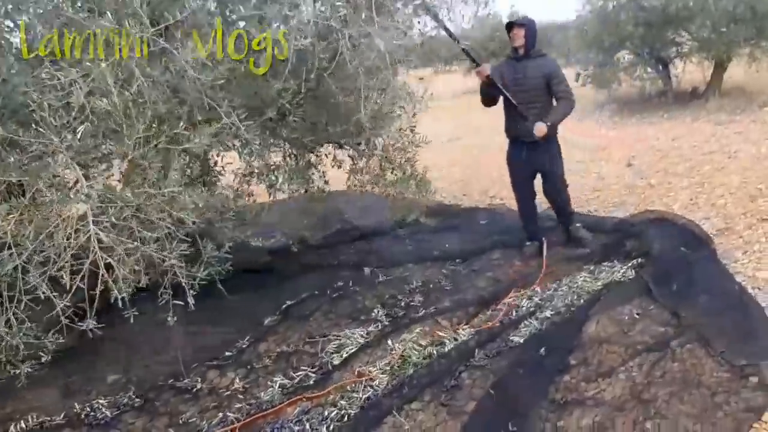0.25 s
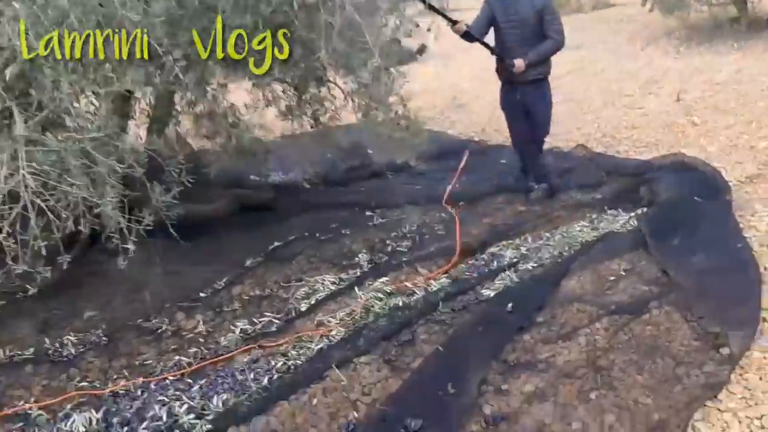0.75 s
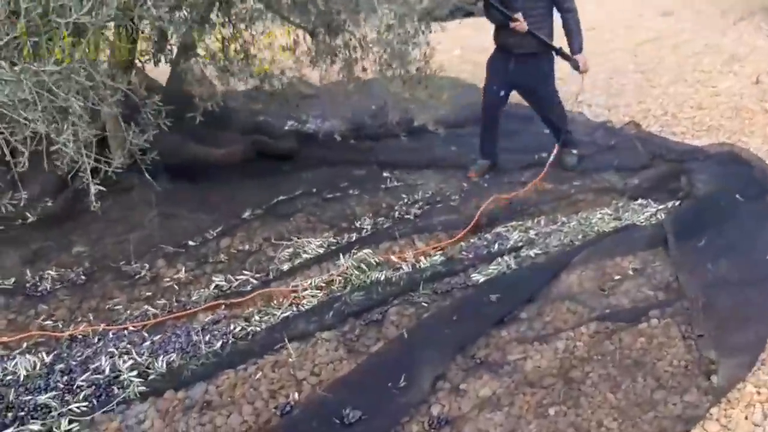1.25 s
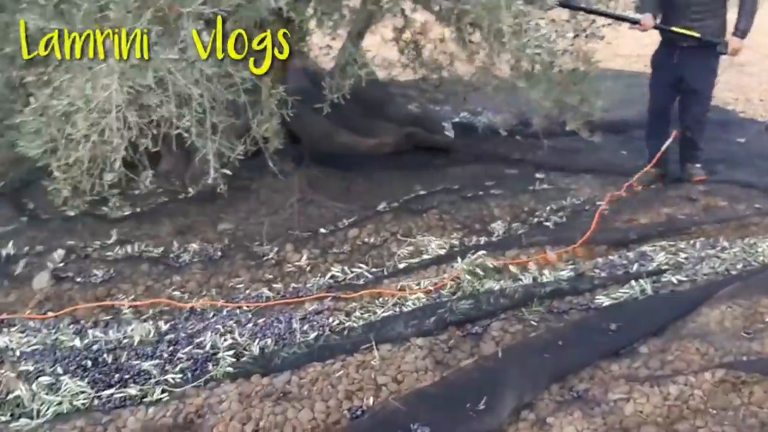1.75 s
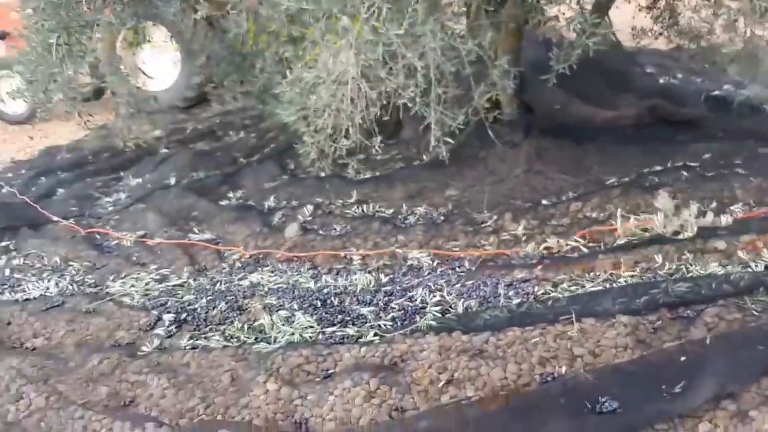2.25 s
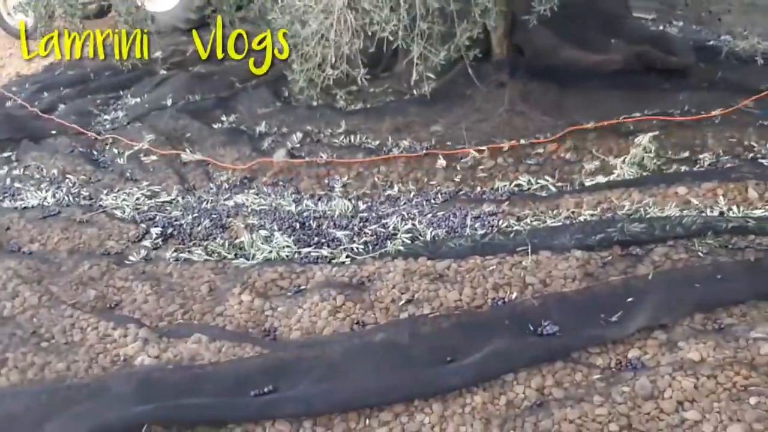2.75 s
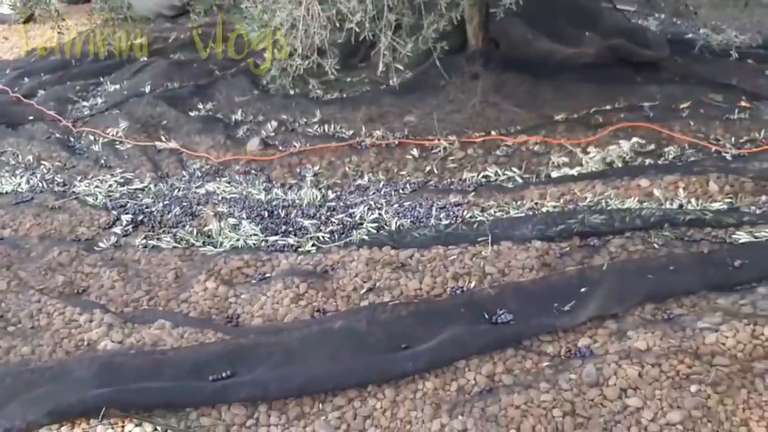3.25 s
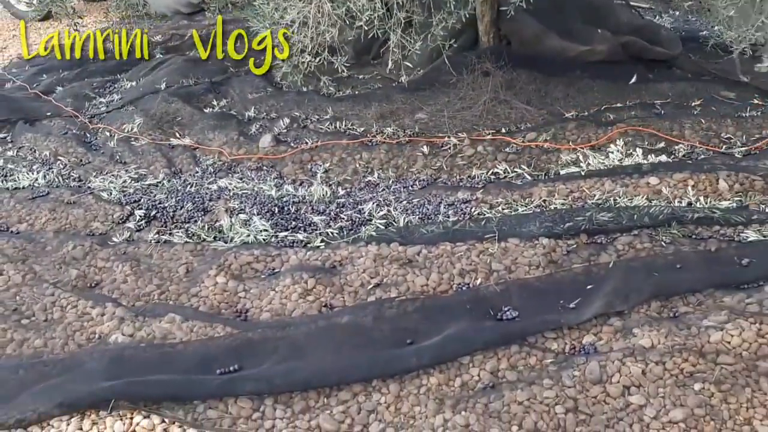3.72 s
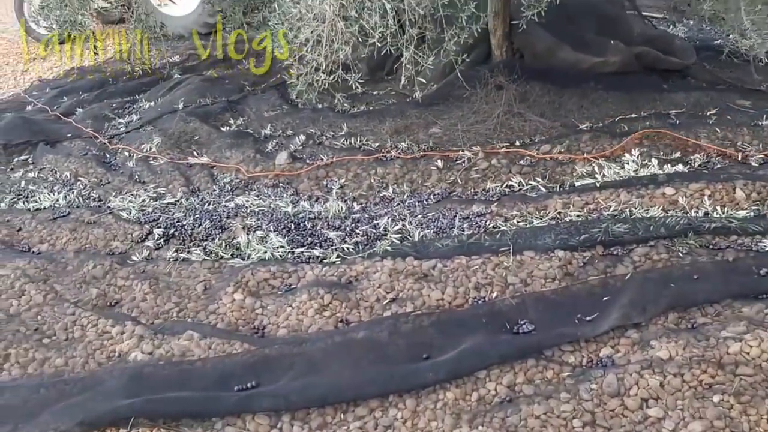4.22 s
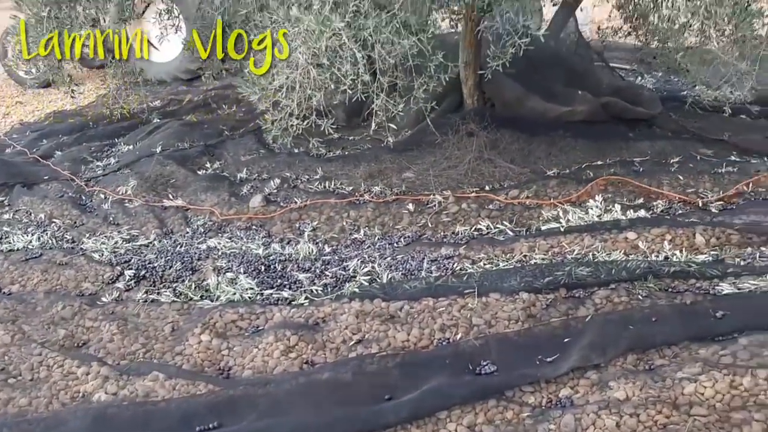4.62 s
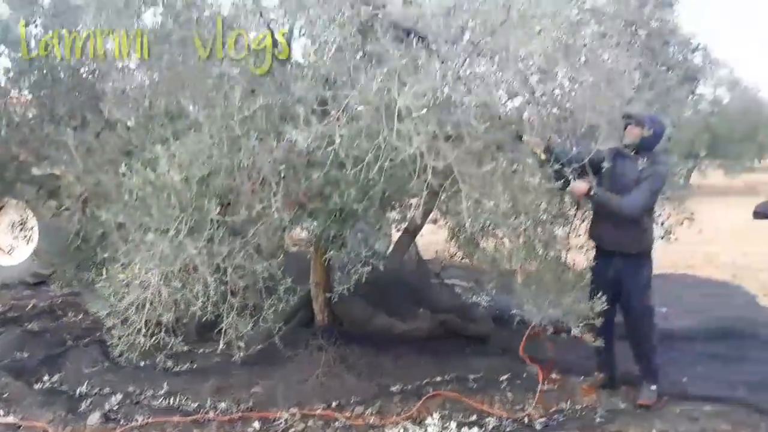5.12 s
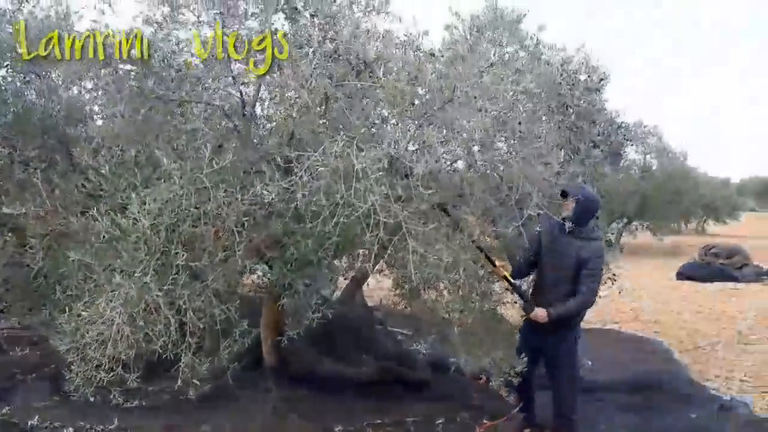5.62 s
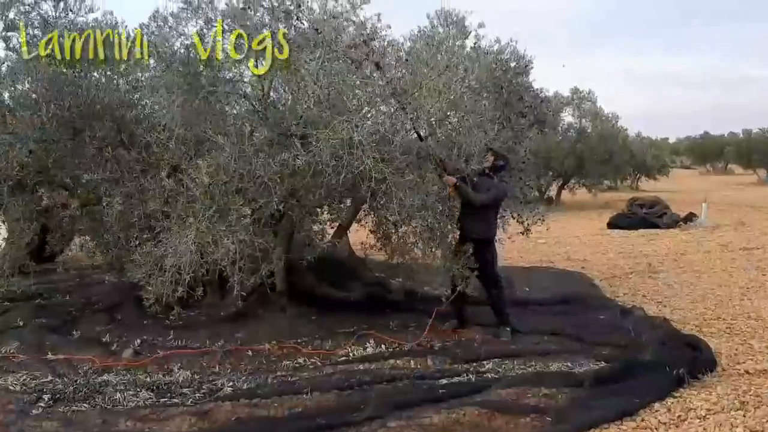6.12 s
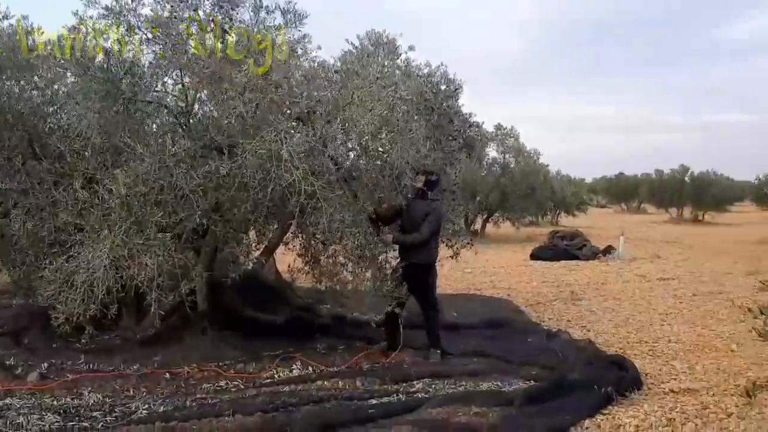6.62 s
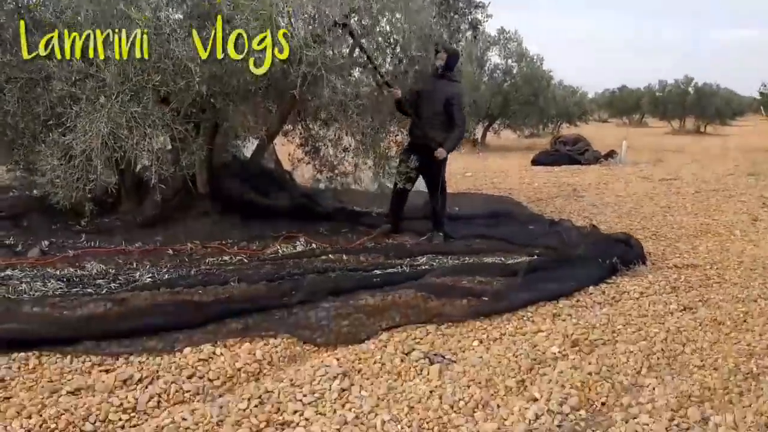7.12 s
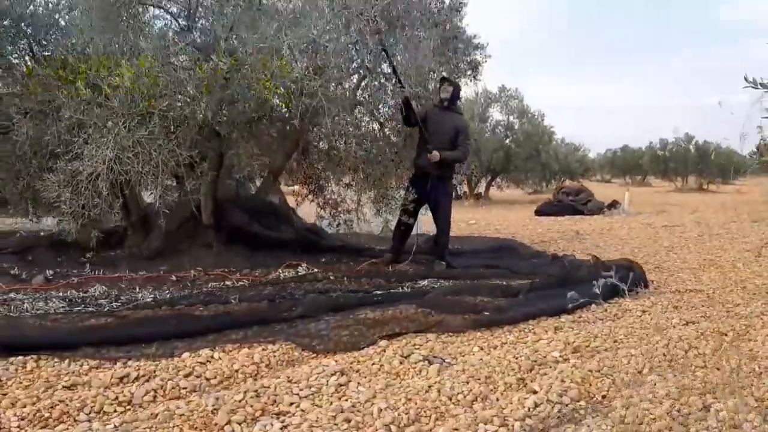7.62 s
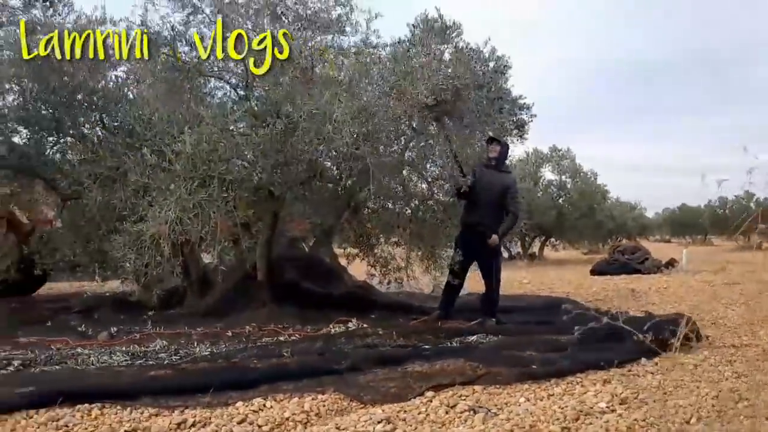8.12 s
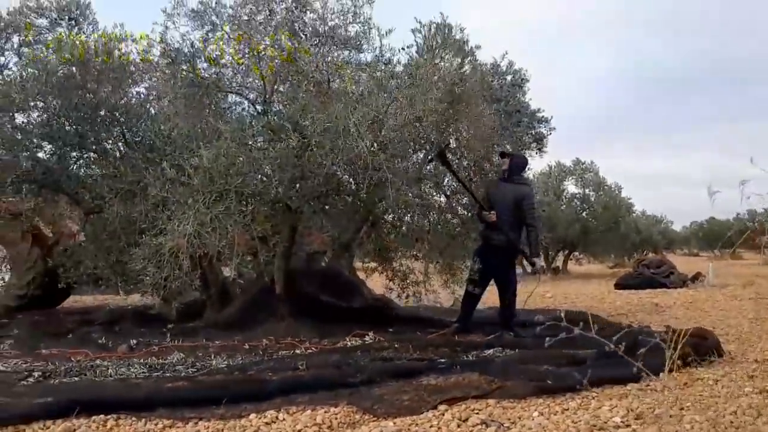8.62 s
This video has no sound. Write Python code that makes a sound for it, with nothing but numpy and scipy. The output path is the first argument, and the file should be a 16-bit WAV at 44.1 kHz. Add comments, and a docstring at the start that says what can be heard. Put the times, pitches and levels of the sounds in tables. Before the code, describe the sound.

A few metres away in an open orchard, an electric rake combs an olive tree, its tines clacking rapidly over a high gear whine. Each push slows the motor and stirs twigs and leaves, with sharp cracks against branches. Past the middle, wind buffets the hand-held microphone. The sound drops out for an instant, then the rake carries on, quieter and farther off.

```python
"""An electric rake combs olives out of a tree, a few metres from a hand-held microphone in an open orchard.
From the start its tines clack at every turn of their stroke over the whine of the gears. Each push into
the foliage slows the motor, muffles the whine and stirs twigs, leaves and boughs; tines crack against
branches, hardest around 2 s. From 5 s wind buffets the microphone. Just before 6 s the sound fades
briefly, then the rake returns farther off and works on to the end."""
import sys
import numpy as np
from scipy import signal
from scipy.fft import rfft, irfft, next_fast_len
from scipy.io import wavfile
from scipy.ndimage import uniform_filter1d

SR = 44100
rng = np.random.default_rng(int(sys.argv[2]) if len(sys.argv) > 2 else 0)


def wav_out(sig):
    """Save sig, one row per channel (or a flat mono array), as 16-bit PCM at SR to the path in sys.argv[1]."""
    wavfile.write(sys.argv[1], SR, np.round(np.clip(np.atleast_2d(sig).T, -1, 1) * 32767).astype(np.int16))


N = 390726
TIME = np.arange(N) / SR

FREE_HZ, TEETH_PER_STROKE, INERTIA_S = 4602, 134.4, .05  # the drive; FREE_HZ is its unloaded whine
CLACK_AT = .5  # where the clack falls in the stroke cycle
STIR_S, SETTLE_S = 0.031, 0.029  # attack and release of the foliage on each push

# Motor speed as the pitch of the whine, sagging under load: (time [s], pitch [Hz])
MOTOR_PITCH = [(.35, 4600), (.5, 4420), (.85, 4310), (1.15, 4300), (1.35, 4570), (1.55, 4590), (1.7, 4250),
               (1.9, 3950), (2.05, 3780), (2.15, 3950), (2.25, 4290), (2.48, 4110), (2.65, 4540),
               (2.9, 4460), (3.15, 4430), (3.3, 4540), (3.5, 4420), (3.72, 4100), (4.0, 4530), (4.5, 4600),
               (4.83, 4600), (4.98, 4330), (5.35, 4150), (5.65, 4560), (6.05, 4580), (6.5, 4200),
               (6.9, 4350), (7.25, 4590), (7.6, 4560), (7.9, 4020), (8.45, 4560), (8.86, 4600)]
# Fader for the gear whine, before load muffles it: (time [s], level [dB])
WHINE_LEVEL = [(0, -62), (1.4, -58.5), (2.75, -58.5), (3.3, -57.5), (4.1, -57.5), (4.45, -50), (4.8, -50.5),
               (4.95, -55), (5.5, -51), (5.68, -45.5), (5.88, -45), (5.98, -62), (6.9, -67), (7.3, -66.5),
               (7.55, -70), (8.2, -66), (8.86, -68)]
# Motor hum, riding on the head's fader: (time [s], fundamental [dB], octave [dB])
HUM_LEVELS = [(0, -14, -12), (.8, -10.5, -14), (2.3, -13, -12), (2.9, -9, -7), (3.4, -6.5, -10),
              (3.7, -17, -16), (4.3, -9.5, -9), (5.2, -40, -9), (5.8, -28, -21), (7.0, -25, -15),
              (7.55, -11.5, -12), (8.86, -12.5, -10.5)]
# Faders for the bed between pushes: (time [s], head clatter [dB], twig rattle [dB], leaf hiss [dB])
BED_LEVELS = [(0, -50, -50, -59), (.3, -49.5, -47.5, -55), (.7, -49.5, -50, -50), (1.1, -45, -50.5, -50.5),
              (1.45, -46, -43.5, -56), (2.0, -46.5, -52.5, -58.5), (2.6, -55, -47, -56.5),
              (3.1, -55, -48, -53.5), (3.6, -46.5, -46, -57.5), (4.3, -47, -44, -57.5),
              (4.75, -44, -44.5, -54.5), (5.3, -48, -48, -62), (5.88, -46, -39.5, -55),
              (5.95, -60.5, -56, -72.5), (6.5, -52.5, -55.5, -63.5), (6.72, -53.5, -57, -53),
              (7.0, -56, -58.5, -64), (7.5, -54, -58, -67), (7.9, -54, -51.5, -56.5),
              (8.4, -55.5, -54, -57), (8.86, -56.5, -55.5, -59.5)]
# Ring of the tines, loudest while they swing free: (time [s], low ring [dB], high ring [dB])
TINE_LEVELS = [(0, -55.5, -64), (.3, -53, -50), (.6, -56, -60), (1.05, -67, -56), (1.25, -59, -58),
               (1.52, -46, -55), (1.75, -51, -59), (2.5, -57.5, -62), (3.45, -67, -50), (3.7, -77, -53),
               (4.05, -46.5, -50.5), (4.45, -50.5, -52), (5.2, -63, -62), (5.85, -49.5, -55),
               (6.0, -61, -65), (7.55, -65, -68), (8.5, -71, -67), (8.86, -59, -52.5)]
# Pushes into the foliage: (start [s], length [s], sprigs against the twig bed [dB],
# twig boost [dB], leaf boost [dB], bough boost [dB])
PUSHES = [(0.37, 0.19, -30, 4.5, 0, 17), (0.608, 0.38, 0, 3.5, 1.5, -9), (0.926, 0.25, 2, 8, 1, 14),
          (1.549, 0.34, -7, 6.5, 11, 15.5), (1.892, 0.36, -1, 10, 12.5, 15.5), (2.244, 0.29, -13, 0, 6, 17),
          (3.302, 0.25, -1, 1.5, 6.5, 7), (3.525, 0.35, 3.5, -3, 11.5, 13.5), (3.89, 0.21, -37, 1, 5.5, 8),
          (4.863, 0.36, -30, 1, 10, 5), (5.196, 0.3, -32, 3, 11.5, 5), (5.51, 0.33, -34, -4, -3.5, 11),
          (6.189, 0.37, -14, 2, 7, 2), (6.815, 0.22, -25, 6, -0.5, 4), (7.668, 0.39, -2, 3, 2, 15.5),
          (8.095, 0.32, -12, -0.5, -2, 11)]
# Tines hitting branches: (time [s], level [dB], brightness [dB], length [factor], ring pitch [Hz])
BRANCH_HITS = [(0.101, -35, -30, 0.49, 3080), (0.2177, -27, -17, 0.48, 5700), (0.375, -29.5, -14, 2, 4560),
               (0.386, -25.5, -14, 4.2, 5430), (0.419, -26.5, -25, 1.3, 2700), (0.5276, -29, -21, .7, 4380),
               (0.6594, -32, -19, 0.49, 4000), (0.8188, -24, -11, 1.2, 5700), (0.958, -25.5, -27, 1, 6150),
               (0.974, -24.5, -23, 0.32, 4860), (1.024, -18, -33, 0.35, 5040), (1.076, -27, -10, 2.4, 4500),
               (1.095, -22, -34, .8, 6300), (1.13, -23.5, -7, 0.81, 5860), (1.1944, -18.5, -3, 0.34, 6500),
               (1.6098, -24.5, -33, 1.7, 5840), (1.724, -21.5, -37, 1.3, 4200),
               (1.894, -26, -10, 1.5, 4200), (1.9228, -29, -7, 0.41, 5530), (1.952, -22.5, -12, 1.9, 5660),
               (1.9636, -21.5, -14, 1.5, 5900), (1.9902, -17.5, -29, 0.77, 6200),
               (2.0334, -12, -1.5, 0.96, 5770), (2.0713, -17.5, -35, 0.87, 5800),
               (2.0973, -16, -1.5, 1.7, 6050), (2.1317, -16.5, 5, 0.98, 5850),
               (2.135, -19.5, -23, .7, 6100), (2.165, -28, -22, 1.1, 3720),
               (2.3721, -24.5, -18, 0.68, 3700), (3.7326, -25, -12, 1.4, 6200),
               (3.7445, -27, -24, 0.8, 6000), (3.8383, -28, -4, 1.2, 6070), (4.609, -26, -14, 0.5, 5030),
               (5.3024, -22, -17, 2.3, 2770), (5.368, -19, -15, 1, 3630), (5.689, -36, -30, 0.69, 3700),
               (6.3032, -38, -14, 1.3, 2830), (6.3669, -36, -8, .5, 3960), (6.487, -33.5, -11.5, 1.7, 5800),
               (6.5258, -29.5, -8, 1.4, 5700), (6.7441, -35, -9, .8, 6490), (6.8122, -30.5, -2, 1.2, 6230),
               (6.853, -30.5, -22, 0.58, 4000), (6.91, -31, -30, 0.58, 4200),
               (6.9142, -34, -36, 0.57, 3700), (7.802, -31, -32, 1, 3670), (7.8567, -24.5, -12, 0.65, 6030),
               (7.984, -30, -10, .7, 3700), (8.049, -33, -22, 3.1, 3650), (8.0582, -31, -19, 2.1, 3600),
               (8.2632, -32, -31, 0.26, 3770)]
# The head shoving a bough: (time [s], level [dB])
BOUGH_HITS = [(0.385, -50), (0.5, -47), (0.939, -45.5), (1.07, -47), (1.109, -52), (1.6, -47.5), (1.7, -56),
              (1.796, -60), (1.955, -45.5), (2.16, -46), (5.3, -56), (7.875, -52.5), (8.688, -56)]

# Tone of each noise layer: (frequency [Hz], level [dB])
HEAD_EQ = [(150, -41.5), (330, -12), (490, -11), (600, -6.5), (680, -7.5), (950, -0.5), (1170, -2),
           (1550, 0), (1850, -2.5), (2250, 1), (2800, -1.5), (4000, -8), (8000, -59.5)]  # midrange clatter of the rake's head
TINE_LOW_EQ = [(300, -27.5), (1200, -10.5), (1900, -11), (2500, 1), (3450, -3), (4200, -19.5), (7000, -8),
               (9000, -51)]  # low ring of the tines
TINE_HIGH_EQ = [(300, -28), (1200, -12.5), (3000, -13), (3750, 2), (4550, -3), (5100, -6.5), (6500, -1),
                (7800, -28.5), (15000, -21)]  # high ring of the tines
TWIG_EQ = [(120, -17.5), (350, -14.5), (800, -4.5), (2000, -9.5), (3100, -1), (3650, 1.5), (4200, -1),
           (5000, -2.5), (5950, -3), (6600, -4.5), (7400, -23), (8300, -18.5), (11000, -19), (16000, -19)]  # dry rattle
LEAF_EQ = [(100, -22.5), (400, -7), (1500, -9.5), (6000, 4.5), (7300, -3.5), (8300, -13.5), (9400, -8.5),
           (10300, -5), (12500, -3), (14500, -4), (16000, -8)]  # airy hiss
THRASH_EQ = [(60, -17), (150, -11), (260, -6), (380, -2), (520, -3), (800, -5.5), (2000, -26)]  # low body of shaken boughs
SPRIG_EQ = [(1000, -60), (4200, -17), (5300, -4), (5900, 5), (6500, 4), (7400, -20.5), (12000, -36)]  # thin, bright patter
CRACK_EQ = [(150, -36), (450, -12), (1100, -7.5), (1900, -9), (2700, -1.5), (3700, 2.5), (4700, -1.5),
            (5900, 3.5), (6700, -3), (8200, -23.5), (10400, -17), (16000, -19.5)]  # struck branch
CLUNK_EQ = [(100, -33), (220, -5.5), (350, -4), (650, -4), (1000, -9), (2000, -12.5), (5000, -45)]  # shoved bough
WIND_EQ = [(20, -25), (40, -21), (70, -3), (100, -2), (150, -3.5), (210, -8.5), (320, -16.5), (600, -26),
           (2000, -85)]  # rumble on the microphone

# Hollow ring of the rake, shifting as the pole swings:
# (time [s], centre [Hz], boost [dB], boost of the upper ring [dB])
POLE_RESONANCE = [(0, 1270, 7, -1), (.8, 1150, 0.5, -0.5), (1.4, 1270, 5.5, -1.5), (2.3, 1110, 3.5, 1.5),
                  (3.3, 1110, 7, -0.5), (4.7, 1140, 2.5, -2.5), (5.25, 1030, 0, 0.5),
                  (6.5, 1100, 5.5, -1.5), (6.9, 1150, 4, 1), (7.15, 1340, 6.5, -0.5), (7.4, 1460, 1, -3.5),
                  (7.8, 1164, 0, -1.5), (8.3, 1160, 1.5, -3.5), (8.75, 1140, 10, -2)]
# Where the microphone points: (time [s], downward tilt [0-1], left channel delay [samples])
MIC_AIM = [(0, 0.4, 1.5), (1.3, 0.43, -0.5), (2.0, 1, 9), (2.6, 1, 11), (4.7, 1, 8.5), (5.15, 0.4, -3),
           (6.7, 0, -2.5), (8.86, 0.44, 1)]
# Colour of the ground reflection at full tilt: (frequency [Hz], gain [dB])
GROUND_EQ = [(230, -11), (420, 0.5), (590, 0), (820, -0.5), (1200, 0), (1400, -0.5), (1620, 3.5),
             (1880, -1), (2300, 2.5), (2550, -1), (2800, 0), (3050, -2.5), (3500, -0.5), (4400, 1),
             (5300, 0.5)]
# Left channel against the right: (frequency [Hz], gain [dB])
LEFT_EQ = [(300, -0.5), (700, -2), (1400, 0.7), (2800, -1.1), (5500, -2), (9000, 1.5), (14000, 0.5)]
# Shading of the left channel at full tilt: (frequency [Hz], gain [dB])
SHADE_EQ = [(500, 1), (1500, 0.5), (3500, -0.5), (6000, -1), (10000, -1.5)]
# Stereo image, tight in the mids and wide on top: (frequency [Hz], channel likeness [0-1])
STEREO_LIKENESS = [(100, 0.88), (300, 0.95), (600, 0.99), (1300, 0.74), (2800, 0.51), (5500, 0.46),
                   (12000, 0)]

# Breeze on the microphone between gusts: (time [s], level [dB])
BREEZE_LEVEL = [(0, -66), (.3, -66), (.9, -67), (1.35, -83), (1.7, -70), (2.0, -80), (3.1, -83.5),
                (3.7, -76), (4.2, -82), (4.7, -74.5), (5.1, -60), (5.4, -57), (5.87, -45), (5.95, -64),
                (6.4, -95), (6.9, -84), (7.6, -73), (8.3, -68), (8.86, -69)]
# Swells of wind: (time [s], half width [s], level [dB])
WIND_GUSTS = [(.02, 0.036, -50.5), (.59, 0.035, -58), (1.01, 0.025, -62), (1.62, 0.036, -66),
              (2.22, 0.025, -64), (2.49, 0.038, -69), (2.81, 0.03, -66), (5.01, 0.015, -54),
              (5.195, 0.025, -43), (5.24, .012, -48), (5.282, .007, -46), (5.318, .012, -48),
              (5.38, 0.0092, -51), (5.48, 0.012, -38.5), (5.575, 0.027, -42.5), (5.695, 0.011, -40.5),
              (5.75, 0.011, -46), (5.81, .018, -39.5), (6.08, 0.021, -62.5), (6.98, 0.028, -58.5),
              (7.35, 0.011, -56.5), (7.62, 0.055, -60.5), (8.52, 0.013, -61), (8.62, 0.043, -56.5),
              (8.84, .02, -62)]
# Single low bumps of wind: (time [s], level [dB], pitch [Hz])
WIND_BUFFETS = [(0.606, -41.5, 155), (5.205, -31, 230), (5.475, -29, 144), (5.488, -30, 131),
                (5.793, -26, 165), (5.855, -32, 178)]
# Master fader, dipping briefly to near silence: (time [s], gain [dB])
MASTER_FADE = [(5.87, 2), (5.9, -25), (5.915, -80), (5.93, -37), (5.95, -12.5), (5.985, 2)]


def amp(db):
    """Decibels to gain."""
    return 10 ** (np.asarray(db) / 20)


def unit(x):
    """Scales to rms 1."""
    return x / np.sqrt(np.mean(x ** 2) + 1e-20)


def curve(rows, column=1, t=TIME):
    """One column of a table as an automation lane of straight ramps."""
    rows = np.array(rows)
    return np.interp(t, rows[:, 0], rows[:, column])


def spectrum_at(points, hz):
    """Reads a spectrum, joined by straight lines on a log frequency axis."""
    f, value = np.transpose(points)
    return np.interp(np.log(hz + 1), np.log(f + 1), value)


def add(mix, s, sound):
    """Mixes a stereo sound in at time s."""
    part = mix[:, max(round(s * SR), 0):][:, :sound.shape[1]]
    part += sound[:, :part.shape[1]]


def wander(hz):
    """Random modulation of rms 1, moving at rates up to hz."""
    coarse = rng.standard_normal(16384)
    rates = np.fft.rfftfreq(len(coarse), TIME[-1] / len(coarse))
    slow = irfft(rfft(coarse) * (rates < hz))
    return unit(np.interp(TIME, np.linspace(0, TIME[-1], len(slow)), slow))


def colour(x, eq):
    """Plays x through a causal EQ of unit energy."""
    log_gain = np.log(amp(spectrum_at(eq, abs(np.fft.fftfreq(4096, 1 / SR)))))
    taps = np.fft.ifft(np.exp(np.conj(signal.hilbert(log_gain)))).real[:2048]
    return signal.oaconvolve(x, taps[None] / np.linalg.norm(taps), axes=1)[:, :x.shape[1]]


def causal(db):
    """Turns gains in dB (bins x frames) into filters that ring only after a hit."""
    cepstrum = irfft(db * np.log(10) / 20, axis=0)
    half = len(cepstrum) // 2
    cepstrum[1:half] *= 2
    cepstrum[half + 1:] = 0
    return np.exp(rfft(cepstrum, axis=0))


def noise_pair(likeness=1.0):
    """Stereo white noise, near mono in the mids and wide in the treble."""
    size = next_fast_len(N, real=True)
    left, other = rfft(rng.standard_normal((2, size), dtype=np.float32))
    same = likeness * spectrum_at(STEREO_LIKENESS, np.fft.rfftfreq(size, 1 / SR))
    same = np.clip(same, 0, .99).astype(np.float32)
    right = same * left + np.sqrt(1 - same ** 2) * other
    return irfft(np.array([left, right]), size)[:, :N]


def texture(power, eq):
    """Stereo noise shaped by a power envelope, then an EQ; rms 1."""
    return unit(colour(noise_pair() * np.sqrt(power), eq))


def die_away(power, decay_s):
    """Gives each impulse of power an exponential tail; mean 1."""
    pole = np.exp(-1 / (decay_s * SR))
    tail = signal.lfilter([1 - pole], [1, -pole], power + 1e-12)
    return tail / tail.mean()


def collisions(per_s, spread_db):
    """Random impulses, a few of them large."""
    chance = rng.random(N) * SR / per_s
    hit, size = chance < 1, np.zeros(N)
    size[hit] = amp(spread_db * np.minimum(-np.log(chance[hit] + 1e-12), 4))
    return size


def grains(per_s, spread_db, decay_s):
    """Grainy power envelope of many small collisions."""
    return die_away(collisions(per_s, spread_db) ** 2, decay_s)


def strokes(turns, at, spread_db):
    """One impulse of power a stroke, at the given share of the cycle, each of its own strength."""
    hits = np.flatnonzero(np.diff(np.floor(turns - at)) > 0)
    accent = np.clip(rng.standard_normal(1000), -2, 2)
    power = np.zeros(N)
    power[hits] = amp(spread_db * accent[:len(hits)]) ** 2
    return power


def tine_clacks(turns, sag_hz):
    """Power envelope of the clacks: two rows of tines reverse a moment apart."""
    accent_db = 2.5 * np.exp(-sag_hz / 550)  # one turn hits harder than the return; load evens them out
    accent = amp(accent_db * np.cos(np.pi * (turns - CLACK_AT))) ** 2
    first, second = (strokes(turns, CLACK_AT - lead, spread_db=1.2) for lead in (.05, 0))
    return die_away(uniform_filter1d(accent * (0.72 * first + second), 30), decay_s=0.003)


def linkage_ticks(turns):
    """Power envelope of the play in the linkage, closing twice between clacks."""
    first, second = (strokes(turns, CLACK_AT + lag, spread_db=1.8) for lag in (1 / 3, 2 / 3))
    return die_away(uniform_filter1d(first + .6 * second, 60), decay_s=0.0024)


def rake(turns, sag_hz):
    """Each stroke clatters the head, rings the tines and shakes a spray of collisions out of the tree."""
    clack, tick = tine_clacks(turns, sag_hz), linkage_ticks(turns)
    shake = .7 + 0.22 * clack
    twigs = grains(700 * shake, spread_db=4.6, decay_s=0.0028)
    leaves = grains(1000 * shake, spread_db=5.5, decay_s=0.00074)
    jolts = grains(400 * shake, spread_db=5.0, decay_s=0.0032)
    clatter = texture(0.3 + 0.29 * clack + 0.19 * tick + 0.22 * jolts, HEAD_EQ)
    head = amp(curve(BED_LEVELS) - 1.24) * clatter
    tree = foliage(clack, tick, shake, twigs, leaves, jolts) + sprigs()
    return head + tree + tine_ring(clack, tick)


def tine_ring(clack, tick):
    """The tines ring briefly at every clack, and more softly as the play in the linkage closes."""
    blows = clack + amp(-10) * tick
    low, high = texture(blows, TINE_LOW_EQ), texture(blows, TINE_HIGH_EQ)
    return amp(curve(TINE_LEVELS)) * low + amp(curve(TINE_LEVELS, column=2)) * high


def gears(turns, sag_hz):
    """The gear mesh whines over the motor's hum; both wobble with the stroke and flutter in the leaves."""
    pitch_hz = (FREE_HZ - sag_hz) * (1 + 0.0026 * wander(hz=25))
    mesh_cycles = np.cumsum(pitch_hz) / SR + 0.12 * np.sin(2 * np.pi * turns)
    judder = .78 + sag_hz / 900  # load roughens the mesh
    whine = np.zeros((2, N))
    for channel in whine:
        tone = np.sin(2 * np.pi * mesh_cycles + judder * wander(hz=80))
        channel += tone * amp(2.4 * wander(hz=90))
    whine *= amp(2.2 * wander(hz=18) + 2 * np.cos(2 * np.pi * turns))
    muffle_db = .011 * sag_hz  # foliage closes around the head
    return amp(curve(WHINE_LEVEL) + 3.0 - muffle_db) * unit(whine) + motor_hum(mesh_cycles / 7.5)


def motor_hum(shaft_turns):
    """The spinning shaft hums: a fluttering fundamental and its octave."""
    hum = np.zeros(N)
    for harmonic in (1, 2):
        tone = np.sin(2 * np.pi * harmonic * shaft_turns + 1.05 * wander(hz=35))
        flutter_db = 2.6 * wander(hz=20)
        hum += amp(curve(HUM_LEVELS, column=harmonic) + flutter_db - 1.5) * tone
    return amp(curve(BED_LEVELS)) * hum


def foliage(clack, tick, shake, twigs, leaves, jolts):
    """Twigs rattle, leaves hiss and boughs thrash under the strokes, swelling with the pushes."""
    scrape = noise_pair() * np.sqrt(0.4 + 0.17 * clack + 0.1 * tick + 0.33 * twigs)
    taps = twig_taps(900 * shake, spread_db=3.0, ring_cycles=6.2)
    rattle = unit(colour(scrape + 0.5 * taps, TWIG_EQ))
    hiss = texture(0.65 + 0.015 * clack + 0.031 * tick + 0.42 * twigs + 0.2 * leaves, LEAF_EQ)
    thrash = texture(0.22 + 1.1 * jolts, THRASH_EQ)
    sway_db = 1.93 * wander(hz=16)  # sprigs catch and slip, so the rustle swells unevenly
    twigs_db = curve(BED_LEVELS, column=2) + push_boost(column=3) + .5 * sway_db
    leaves_db = curve(BED_LEVELS, column=3) + push_boost(column=4) + sway_db + 3.5
    boughs_db = curve(BED_LEVELS) - 23 + push_boost(column=5)
    return amp(twigs_db) * rattle + amp(leaves_db) * hiss + amp(boughs_db) * thrash


def push_boost(column):
    """One column of PUSHES as a fader move in dB: each push takes hold, stays and lets go."""
    boost_db = np.zeros(N)
    for push in PUSHES:
        start = max(round(push[0] * SR), 0)
        t = TIME[:N - start][:2 * SR]
        attack = 1 - np.exp(-t / STIR_S)
        release = np.exp(-np.maximum(t - push[1], 0) / SETTLE_S)
        boost_db[start:start + len(t)] += push[column] * attack * release
    return boost_db


def twig_taps(per_s, spread_db, ring_cycles, count=28):
    """Twigs of many sizes tap each other; each rings for a few cycles at its own pitch."""
    size, t = collisions(per_s, spread_db), np.arange(256) / SR
    onsets = np.flatnonzero(size)
    twig = rng.integers(count, size=N)[onsets]
    hz = np.linspace(2100, 7000, count)[:, None]
    phases = rng.standard_normal((2, count, 1))  # each twig lies in its own direction
    rings = np.sin(2 * np.pi * hz * t + phases) * np.exp(-t * hz / ring_cycles)
    taps = rings[:, twig] * size[onsets, None]
    samples = (onsets[:, None] + np.arange(len(t))).ravel()
    return unit(np.array([np.bincount(samples, side.ravel(), N)[:N] for side in taps]))


def sprigs():
    """Where a push meets thin dry sprigs, they patter brightly against the tines."""
    gain = np.zeros(N)
    for start, length, db, *_ in PUSHES:
        attack = np.clip((TIME - start) / STIR_S, 0, 1)
        release = np.exp(-np.maximum(TIME - start - length, 0) / SETTLE_S)
        gain += amp(db) * attack * release
    patter = noise_pair() * np.sqrt(.2 + .8 * grains(400, spread_db=13.5, decay_s=0.002))
    return amp(curve(BED_LEVELS, column=2)) * gain * unit(colour(patter, SPRIG_EQ))


def branch_cracks(ring_width_hz=75):
    """A tine cracks against wood; the branch rings at its own pitch and foliage scatters a short tail."""
    out, t = np.zeros((2, N)), np.arange(6000) / SR
    wood = colour(noise_pair(), CRACK_EQ)
    treble = signal.sosfilt(signal.butter(2, 8500, "high", fs=SR, output="sos"), wood)
    attack = 1 - np.exp(-t / .00015)
    tail = amp(-21) * np.exp(-t / .022)
    for s, db, bright_db, length, hz in BRANCH_HITS:
        start = rng.integers(N - len(t))
        part = slice(start, start + len(t))
        snap = amp(-4) * np.exp(-t / 0.0004) / max(length, 1) ** 2  # long scrapes have little snap
        body = .8 * np.exp(-t / (.005 * max(length, .1)))
        ring = np.sin(2 * np.pi * (hz * t + rng.random((2, 1)))) * np.exp(-np.pi * ring_width_hz * t)
        crack = unit(wood[:, part] + amp(bright_db + 18.0) * treble[:, part])
        add(out, s, amp(db - 4.0) * (attack * (snap + body + tail) * crack + amp(-13) * ring))
    return out


def bough_clunks(rise_s=0.011):
    """The head shoves a bough: a short, hollow clunk."""
    out, t = np.zeros((2, N)), np.arange(8000) / SR
    bough = colour(noise_pair(), CLUNK_EQ)
    envelope = t / rise_s * np.exp(1 - t / rise_s)
    for s, db in BOUGH_HITS:
        start = rng.integers(N - len(t))
        add(out, s, amp(db) * envelope * unit(bough[:, start:start + len(t)]))
    return out


def perspective(x, upper_ring_hz=2400, upper_width_hz=950):
    """The swinging pole shifts the tone; turning the microphone moves the image and adds ground colour."""
    hz, t, frames = signal.stft(x, SR, nperseg=1024, noverlap=768)
    hz = hz[:, None]
    tilt, delay_s = curve(MIC_AIM, t=t), curve(MIC_AIM, column=2, t=t) / SR
    ground_db = spectrum_at(GROUND_EQ, hz) * tilt
    ring_hz, ring_db, upper_db = (curve(POLE_RESONANCE, column, t) for column in (1, 2, 3))
    hollow_db = ring_db * np.exp(-((hz - ring_hz) / 80) ** 2)
    hollow_db += upper_db * np.exp(-((hz - upper_ring_hz) / upper_width_hz) ** 2)
    # echoes from trunk and boughs raise and cancel narrow bands that drift
    ripple = uniform_filter1d(rng.standard_normal(frames.shape[1:]), size=4, axis=0)
    ripple = uniform_filter1d(ripple, size=45, axis=1)
    echoes_db = 1.9 * unit(ripple) / (1 + (hz / 7000) ** 2)
    frames = frames * causal(ground_db + hollow_db + echoes_db)
    left_db = spectrum_at(LEFT_EQ, hz) + spectrum_at(SHADE_EQ, hz) * tilt
    frames[0] *= np.exp(-2j * np.pi * hz * delay_s) * amp(left_db)
    return signal.istft(frames, SR, nperseg=1024, noverlap=768)[1][:, :N]


def wind():
    """Lumpy turbulence, different on each side of the microphone, with a few hard buffets."""
    lumps = amp(2.1 * np.array([wander(hz=24.4), wander(hz=26.7)]))
    out = gust_envelope() * unit(colour(noise_pair(likeness=0.25) * lumps, WIND_EQ))
    t = np.arange(-900, 900) / SR
    phases = np.array([[0], [1.3]])  # an eddy reaches the two sides out of step
    for s, db, hz in WIND_BUFFETS:
        bump = np.sin(2 * np.pi * hz * t + phases) * np.exp(-(t * hz / 0.46) ** 2)
        add(out, s + t[0], amp(db - 0.5) * bump)
    return out


def gust_envelope():
    """Gusts swell and die on top of the breeze."""
    power = amp(curve(BREEZE_LEVEL)) ** 2
    for s, width, db in WIND_GUSTS:
        near = abs(TIME - s) < 10 * width
        power[near] += (amp(db) / np.cosh((TIME[near] - s) / width)) ** 2
    return np.sqrt(power)


def scene():
    """The motor's speed drives stroke and whine; wood hits accent the rake and wind sits underneath."""
    motor_hz = uniform_filter1d(curve(MOTOR_PITCH), round(INERTIA_S * SR))
    sag_hz = FREE_HZ - motor_hz
    turns = np.cumsum(motor_hz) / SR / TEETH_PER_STROKE
    harvest = rake(turns, sag_hz) + gears(turns, sag_hz) + branch_cracks() + bough_clunks()
    return perspective(harvest) * amp(-0.23) + wind() * amp([[0.1], [1.3]])


def record(dry):
    """Master chain: the brief fade, then a steep high cut at 15.8 kHz."""
    low_pass = signal.firwin(511, 15800, window=("kaiser", 9), fs=SR)
    return signal.oaconvolve(dry * amp(curve(MASTER_FADE)), low_pass[None], "same")


dry = scene()
out = record(dry)
wav_out(out)
```